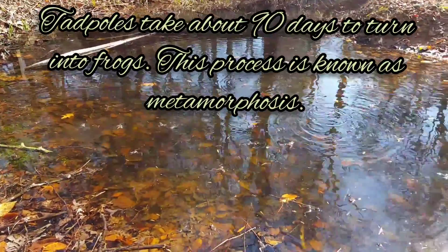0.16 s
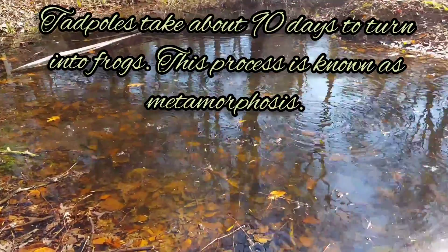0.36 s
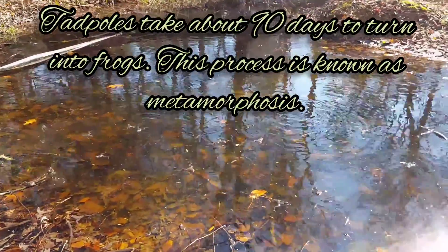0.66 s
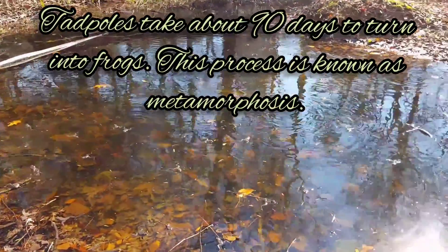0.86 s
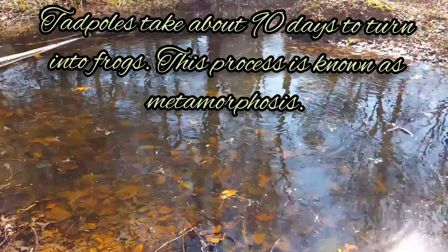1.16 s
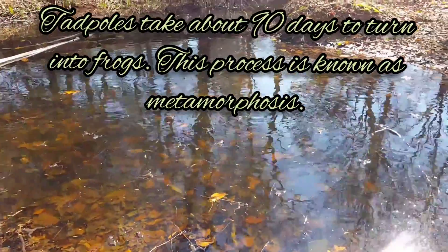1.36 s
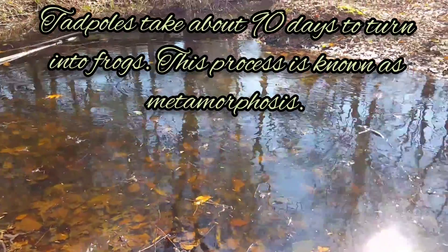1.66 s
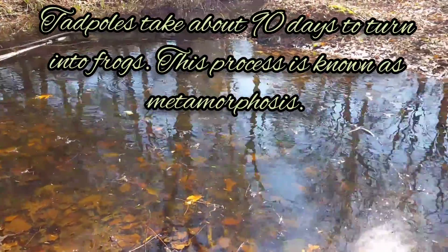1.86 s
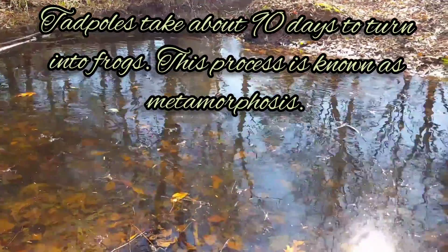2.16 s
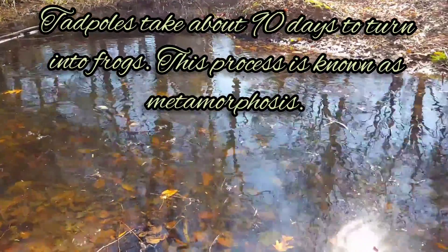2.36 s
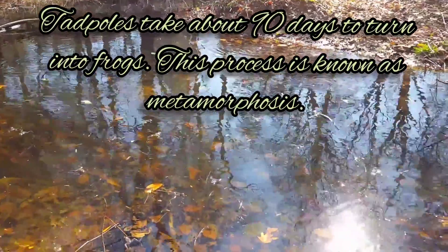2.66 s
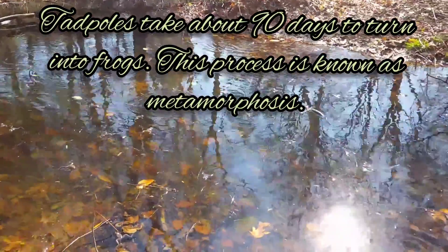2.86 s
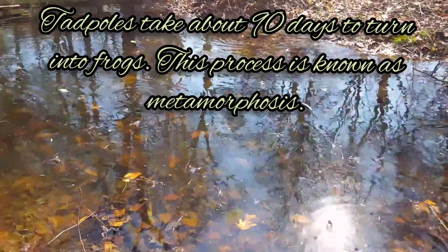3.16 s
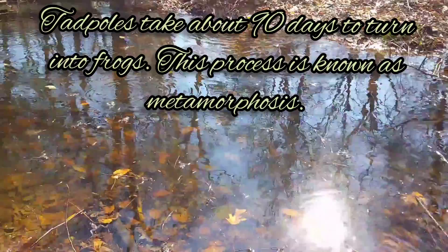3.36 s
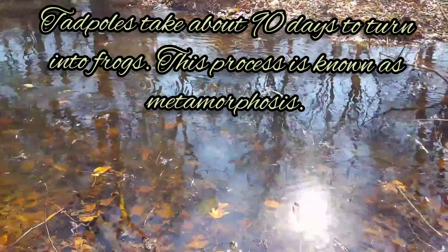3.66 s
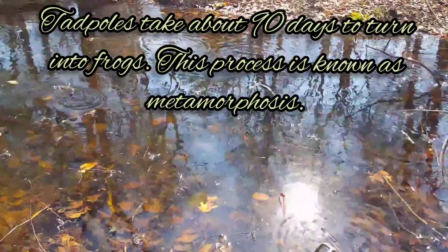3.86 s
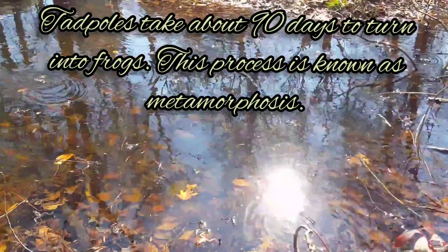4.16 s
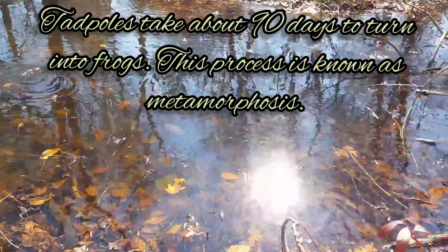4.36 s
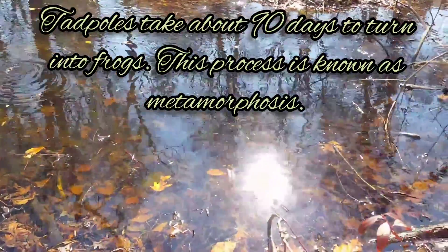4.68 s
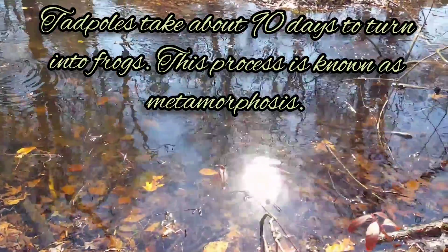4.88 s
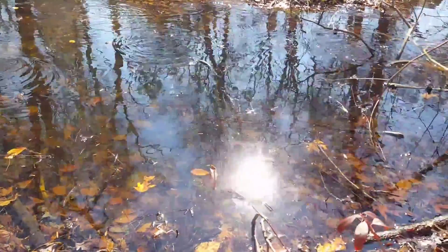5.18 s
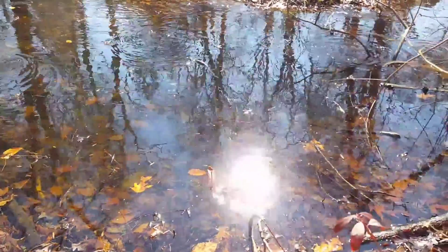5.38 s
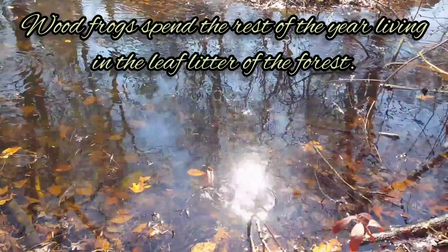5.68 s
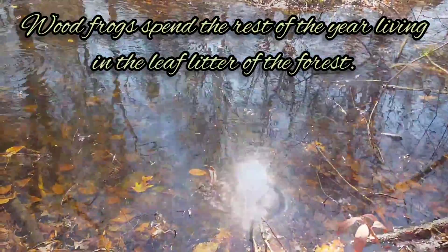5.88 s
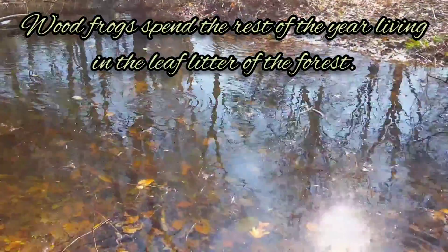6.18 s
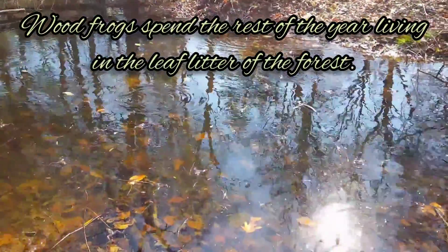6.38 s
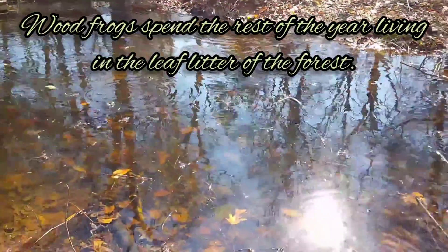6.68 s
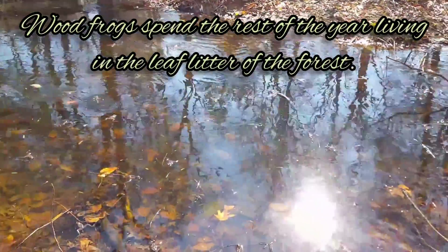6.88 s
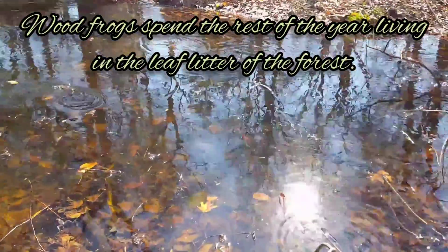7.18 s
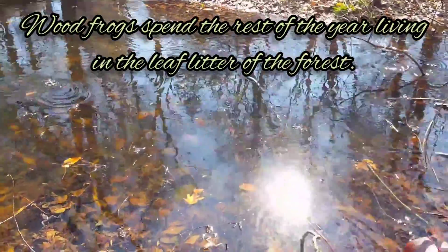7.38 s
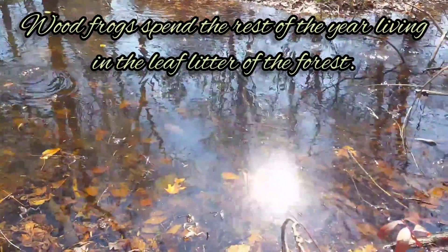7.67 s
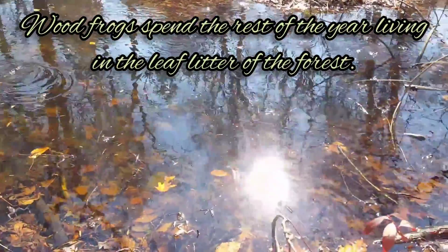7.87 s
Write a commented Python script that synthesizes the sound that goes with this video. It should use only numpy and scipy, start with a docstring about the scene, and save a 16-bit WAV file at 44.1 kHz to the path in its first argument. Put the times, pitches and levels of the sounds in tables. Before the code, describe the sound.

Dozens of wood frogs cluck over one another in a dense, uneven chorus at a woodland pond, with dry ticks close on the right.

```python
"""Wood frogs on a pond

Wood frogs cluck over each other: each cluck is a short run of throat pulses ringing in the vocal sacs.
Thin pulsed chirps pass above them, dry ticks crackle near the right microphone port, and far traffic
hums as shaped noise. Soft low thumps come in now and then, and the woods blur the calls.
The sound is an edited loop: near the end an earlier stretch fades in over the running one."""
import sys
import numpy as np
from scipy import signal
from scipy.fft import rfft, irfft, next_fast_len
from scipy.io import wavfile
from scipy.ndimage import map_coordinates

SR = 44100
rng = np.random.default_rng(int(sys.argv[2]) if len(sys.argv) > 2 else 0)


def waveform_to_disk(signal):
    """Save audio, clipped to [-1, 1], as 16-bit WAV at the path in sys.argv[1]."""
    frames = np.transpose(np.atleast_2d(signal))
    scaled = np.clip(frames, -1, 1) * 32767
    samples = np.round(scaled).astype(np.int16)
    wavfile.write(sys.argv[1], SR, samples)


N = 354123
SIZE = 4096  # samples in one short call
HZ = np.fft.rfftfreq(SIZE, 1 / SR)

# Near clucks, the long rows being two or more run together, levels relative to each other:
# middle_s [s], level_db [dB], length_ms [ms]
NEAR_CLUCKS = [(0.053, -19, 54.3), (0.302, -24, 43.5), (0.389, -16, 20), (0.472, -20, 44.4),
               (0.524, -15.5, 14), (0.624, -36.5, 16), (0.679, -30.5, 17.9), (0.731, -20, 17),
               (0.785, -26, 21), (0.924, -18, 17.2), (0.976, -21.5, 36.4), (1.035, -22.5, 40),
               (1.079, -18.5, 17.5), (1.107, -21, 25.6), (1.131, -23, 45), (1.162, -18.5, 22),
               (1.231, -20, 19.4), (1.259, -17.5, 18), (1.354, -26.5, 21), (1.47, -28, 39),
               (1.542, -14.5, 27), (1.577, -18.5, 41.5), (1.619, -16.5, 54.5), (1.676, -22, 31),
               (1.734, -28.5, 19), (1.826, -25, 32), (1.86, -27, 22), (1.973, -23, 50), (2.03, -17, 27.5),
               (2.11, -18, 53), (2.187, -20, 21), (2.227, -22, 22.6), (2.344, -30.5, 16),
               (2.396, -19.5, 21), (2.504, -26, 37), (2.55, -22, 22), (2.613, -21, 22.6),
               (2.745, -29.5, 14.7), (2.786, -16.5, 32.6), (2.83, -17, 17.4), (2.903, -28.5, 21.6),
               (3.006, -22, 22.3), (3.101, -28, 30), (3.165, -22, 21), (3.234, -21.5, 47),
               (3.275, -16.5, 27.4), (3.332, -14.5, 22.3), (3.419, -26, 19), (3.538, -21, 16),
               (3.582, -20, 17.6), (3.656, -26.5, 21.5), (3.708, -26, 21.6), (3.767, -29.5, 28),
               (3.796, -21.5, 18.2), (3.856, -19.5, 30), (3.91, -14, 26.4), (3.948, -24.5, 24.3),
               (3.983, -26, 24.6), (4.017, -24, 23.6), (4.054, -27.5, 24.3), (4.092, -23.5, 24),
               (4.198, -22, 30.7), (4.344, -21.5, 19.7), (4.385, -19, 46.5), (4.432, -20, 23),
               (4.491, -23, 15), (4.549, -23, 20.7), (4.602, -23, 28.6), (4.782, -19.5, 35),
               (4.874, -23, 37.5), (4.894, -19.5, 29.6), (5.051, -28, 26.4), (5.167, -15.5, 15.6),
               (5.231, -15.5, 40.3), (5.253, -18.5, 20), (5.331, -20.5, 24), (5.375, -24, 24),
               (5.396, -26, 58), (5.525, -24.5, 13), (5.577, -28, 27), (5.657, -22.5, 54), (5.718, -19, 49),
               (5.79, -25, 42), (6.023, -18.5, 44.6), (6.094, -13.5, 21)]
# The loop edit: fade_start_s [s], fade_end_s [s], jump_back [samples]
LOOP_EDIT = (5.55, 6.52, 146430)


def amp(db):
    """Turn a level in dB into a gain."""
    return 10 ** (np.asarray(db) / 20)


def unit(x):
    """Scale x to an rms of 1."""
    return x / np.sqrt(np.mean(x ** 2) + 1e-20)


def along(points, hz):
    """Read (Hz, value) points at hz, with straight lines on a log frequency axis."""
    point_hz, values = np.transpose(points)
    return np.interp(np.log(hz + 1), np.log(point_hz + 1), values)


def curve(rows, s):
    """Read a (s, value) table at times s."""
    return np.interp(s, *np.transpose(rows))


def filtered(x, response):
    """Shape the spectrum of x by a gain that depends on frequency."""
    length = next_fast_len(N + SIZE)
    gain = response(np.fft.rfftfreq(length, 1 / SR))
    return irfft(rfft(x, length) * gain, length)[..., :N]


def resonance(hz, width_hz):
    """One ringing resonance: it starts when struck, and its gain is 1 at its centre."""
    return 1j * HZ * width_hz / (hz * hz - HZ * HZ + 1j * HZ * width_hz)


def add(track, s, spectrum, db, ms, left_late_ms, pan_db):
    """Place a short sound in stereo: it reaches the two ports at different times and levels."""
    lead_s = .001  # room for the port that hears it early
    delay_s = lead_s + np.array([[left_late_ms], [-left_late_ms]]) / 2000
    sound = irfft(spectrum * np.exp(-2j * np.pi * HZ * delay_s), SIZE)
    # Before panning, the left energy equals that of a steady sound at this level lasting ms
    sound *= amp(db) * np.sqrt(ms / 1000 * SR / np.sum(sound[0] ** 2))
    start = max(round((s - lead_s) * SR), 0)
    track[:, start:start + SIZE] += sound * amp([[pan_db / 2], [-pan_db / 2]])


def pulses(times):
    """Spectra of clicks at any times in seconds, one row each."""
    return np.exp(-2j * np.pi * np.outer(times, HZ))


def air():
    """Far traffic and quiet woods as noise: the bass is alike at both ports, the treble is not."""
    # Shape of the noise spectrum: pitch_hz [Hz], relative_db [dB]
    air_shape = [(15, -11.5), (95, -1), (320, -15.5), (700, -6.5), (2000, -18), (5500, -28.5), (7500, -34),
                 (14000, -53.5), (15500, -55)]
    # Loudness of the air before the left is lowered: time_s [s], level_db [dB]
    traffic_level = [(0, -47.5), (1.5, -47.5)]

    def response(hz):
        likeness = np.clip(along([(60, .82), (400, .7), (2000, .1)], hz), 0, 1)  # between the ports
        turn = np.arccos(likeness) / 2
        return amp(along(air_shape, hz)) * [np.cos(turn), np.sin(turn)]

    mid, side = filtered(rng.standard_normal((2, N)), response)
    level_db = curve(traffic_level, np.arange(N) / SR) - [[1.7], [0]]  # left a little softer
    return amp(level_db) * unit(np.array([mid + side, mid - side]))


def cluck(ms, rate_hz, upper_hz, chance):
    """The pulses tend to speed up a little; the bright throat speaks first, the sac fills and rings last."""
    # Throat resonances all frogs share, before random scatter: pitch_hz [Hz], width_hz [Hz], level_db [dB]
    throat_rows = [(662, 89, -4), (1178, 160, 1), (1500, 470, -7.5), (2240, 990, -15.5)]
    rate_hz = rate_hz * (1 + .04 * chance[78])
    count = int(1.5 * ms / 1000 * rate_hz) + 2
    u = (np.arange(count) + .5) / count  # progress through the call, 0 to 1
    gaps_s = (1.04 - .08 * u + .045 * chance[:count]) / rate_hz
    clicks = pulses(np.cumsum(gaps_s))
    sizes = amp(1.8 * chance[40:40 + count])
    scatter = amp(3.5 * chance[70:76])

    throat = resonance(upper_hz, 223)
    for k, (hz, width_hz, db) in enumerate(throat_rows):
        throat = throat + (-1) ** k * amp(db) * scatter[k] * resonance(hz, width_hz)
    soft = 1 / (1 + 1.4j * HZ / 2600 - (HZ / 2600) ** 2)  # vocal folds close softly: no hard edge
    twang = amp(-24) * scatter[-1] * resonance(4650 + 330 * chance[79], 400) ** 2  # a small high cavity
    sac_hz = rate_hz * np.round(750 / rate_hz)  # the swollen sac rings on the overtone next to 750 Hz
    sac = resonance(sac_hz, 235) * soft

    early_swell = np.sin(np.pi * u) ** 1.23
    late_swell = np.sin(np.pi * u ** 1.3) ** 2
    bright = sizes * early_swell @ clicks * (throat * soft + twang)
    deep = amp(-4.5) * sizes * late_swell @ clicks * sac
    low = 540 / (1j * HZ + 1)
    small_body = 1 / (1 + 1.068 * low + low ** 2) ** 3  # a small body sends out no bass
    dull = 1 / (1 + 1.4j * HZ / 6000 - (HZ / 6000) ** 2) ** 2  # softens the top
    return (bright + deep) * small_body * dull


def near_frogs():
    """The clucks that stand out: each frog's spot on the water sets its delay between the ports."""
    # The near males: pulse_rate_hz [Hz, on average], upper_resonance_hz [Hz], left_late_ms [ms]
    frogs = [(274.3, 1146, -0.23), (404.5, 1240, 0.19), (404.5, 1348, -0.24), (379.9, 1440, 0.24),
             (181.7, 1304, 0.21), (388.2, 1446, -0.083), (279.5, 1490, -0.27), (415, 2110, -0.017),
             (201, 1640, 0.14), (182.2, 1650, -0.32), (249.3, 1560, 0.23), (210.4, 1444, -0.15)]
    # Which frog gives each row of near clucks: frog [row number in frogs, from 0]
    callers = [3, 1, 5, 5, 7, 0, 11, 2, 6, 5, 3, 3, 5, 6, 3, 2, 11, 3, 11, 0, 2, 2, 3, 2, 6, 10, 6, 10, 10,
               10, 4, 5, 6, 6, 8, 1, 1, 11, 3, 2, 1, 3, 8, 3, 9, 10, 11, 2, 2, 9, 2, 10, 9, 1, 8, 3, 4, 1,
               5, 3, 3, 1, 3, 6, 5, 0, 2, 10, 5, 3, 4, 0, 2, 8, 4, 4, 8, 4, 9, 0, 2, 11, 2, 5, 3]
    track = np.zeros((2, N + SIZE))
    chances = rng.standard_normal((len(NEAR_CLUCKS), 80))
    for (middle_s, db, ms), frog, chance in zip(NEAR_CLUCKS, callers, chances):
        rate_hz, upper_hz, left_late_ms = frogs[int(frog)]
        start_s = middle_s - .75 * ms / 1000 - .005
        add(track, start_s, cluck(ms, rate_hz, upper_hz, chance), db - 2.5, ms, left_late_ms, -1.4)
    return track[:, :N]


def far_frogs(count=300):
    """Weaker clucks at scattered pitches and places; they join in when near males call, hush when they pause."""
    base_db, ms = -31.5, 22
    track = np.zeros((2, N + SIZE))
    draws, chances = rng.random((count, 4)), rng.standard_normal((count, 81))
    near_s, near_db, _ = np.transpose(NEAR_CLUCKS)
    for k, ((when, pitch, upper, side), chance) in enumerate(zip(draws, chances)):
        s = (k + 2 * when) / count * LOOP_EDIT[1]
        # A loud neighbour close in time stirs them most
        pull_db = .5 * (near_db + 21.5) - 150 * np.abs(near_s - s - .017)
        stir_db = max(pull_db.max(), -13)
        call = cluck(ms, 170 + 250 * pitch, 1100 + 500 * upper, chance)
        add(track, s, call, base_db + stir_db + 3 * chance[80], ms, side - .5, -1.4)
    return track[:, :N]


def chirps(count=5):
    """A narrow high resonance struck about 140 times a second."""
    # The chirps: start_s [s], level_db [dB], pitch_hz [Hz]
    chirp_rows = [(.28, -46.5, 4760), (0.658, -46, 3820), (0.699, -43, 3830), (.721, -43.5, 3740),
                  (1.085, -46, 3990), (1.133, -42, 3980), (1.235, -37.5, 4520), (1.597, -47, 4680),
                  (3.774, -48, 5070), (3.99, -49.5, 4320)]
    track = np.zeros((2, N + SIZE))
    chances = rng.standard_normal((len(chirp_rows), 2 * count + 1))
    for (s, db, hz), chance in zip(chirp_rows, chances):
        times = .007 * (np.arange(count) + .06 * chance[:count] + .2)
        sizes = amp(2.5 * chance[count:-1])
        tone = sizes @ pulses(times) * resonance(hz, 220) ** 2
        add(track, s, tone, db, 35, 0.12 * chance[-1], -2.5)
    return track[:, :N]


def woods(x):
    """Trunks and banks send back a short blur: noise that dies away by 60 dB in 0.1 s."""
    life_s = np.arange(SR // 4) / SR
    tail = rng.standard_normal((2, len(life_s))) * amp(-60 * life_s / 0.1)
    tail = tail / np.linalg.norm(tail, axis=1, keepdims=True)
    return signal.fftconvolve(x, tail, axes=1)[:, :N]


def bumps():
    """Soft low thumps of hand or wind on the ports: swells of bass noise, partly different at each port."""
    # The thumps: start_s [s], level_db [dB], length_ms [ms]
    bump_rows = [(1.07, -47, 34), (1.98, -37, 64), (2.24, -40, 53), (5.48, -46, 67)]
    t, swell = np.arange(N) / SR, np.zeros(N)
    for s, db, ms in bump_rows:
        swell += amp(db) * np.sin(np.pi * np.clip((t - s) * 1000 / ms, 0, 1))
    bass_shape = [(15, -11), (50, 1.5), (200, -4.5), (500, -52)]  # (Hz, relative dB)
    shared, own = filtered(rng.standard_normal((2, N)), lambda hz: amp(along(bass_shape, hz)))
    return swell * unit(shared + [[.4], [-.4]] * own)


def ticks():
    """Dry snaps close to the right port: fast-dying noise bursts, over a fine crackle that comes in clumps."""
    # The snaps, levels before noise and filter: time_s [s], level_db [dB]
    snap_rows = [(1.726, -30.5), (2.0812, -37.5), (2.3101, -36.5), (2.6386, -37), (2.9552, -33),
                 (3.2159, -29.5), (3.2725, -34), (3.8332, -47), (4.458, -32.5), (4.6695, -54),
                 (4.6964, -24.5), (4.7227, -37)]
    # Tone colour of snaps and crackle: pitch_hz [Hz], relative_db [dB]
    snap_shape = [(1500, -11), (4000, -11), (7500, -14.5), (13000, -6), (14500, -7), (15500, -25)]
    # Fine crackle, before clumping and later gains: time_s [s], level_db [dB]
    rustle_level = [(0, -93), (1.1, -94), (1.4, -83), (2.6, -80.5), (5.3, -72), (6, -83)]
    t = np.arange(N) / SR
    clumps = map_coordinates(rng.standard_normal(N // 2000 + 4), [np.arange(N) / 2000])
    rustle = amp(curve(rustle_level, t) + 3.05 * clumps)
    struck = rng.random(N) < 110 / SR  # about 110 grains a second
    grain_db = 23.5 + 6.63 * rng.exponential(size=N).clip(0, 2.5)
    grains = struck * rustle * amp(grain_db)
    for s, db in snap_rows:
        grains[round(s * SR)] = amp(db + 4.5)

    ring = amp(-60 * np.arange(400) / SR / 0.01)  # falls at 60 dB per 10 ms
    burst = rng.standard_normal((2, N)) * signal.fftconvolve(grains, ring)[:N]
    hiss = rustle * amp(25) * rng.standard_normal((2, N))

    def response(hz):
        left_db = along([(3000, 1), (13000, -9)], hz)  # the far port loses treble
        return amp(along(snap_shape, hz) + np.array([left_db, 0 * hz]))

    return filtered(burst + 1.15 * burst[1] + hiss, response)


def scene():
    """Frogs and chirps in the woods, with the close sounds and the air."""
    calls = near_frogs() + far_frogs() + chirps()
    echo = amp(-11) * woods(calls)
    return calls + echo + ticks() + air() + bumps()


def record(dry):
    """Cross-fade to the earlier stretch, and keep nothing above the band limit."""
    top_hz = 15773
    start_s, end_s, back = LOOP_EDIT
    fade = np.clip((np.arange(N) / SR - start_s) / (end_s - start_s), 0, 1)
    earlier = np.pad(dry, ((0, 0), (back, 0)))[:, :N]
    return filtered((1 - fade) * dry + fade * earlier, lambda hz: hz < top_hz)


dry = scene()
out = record(dry)
waveform_to_disk(out)
```